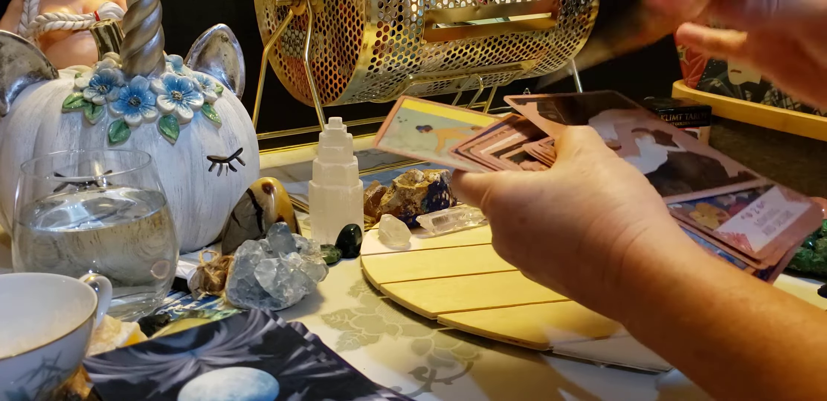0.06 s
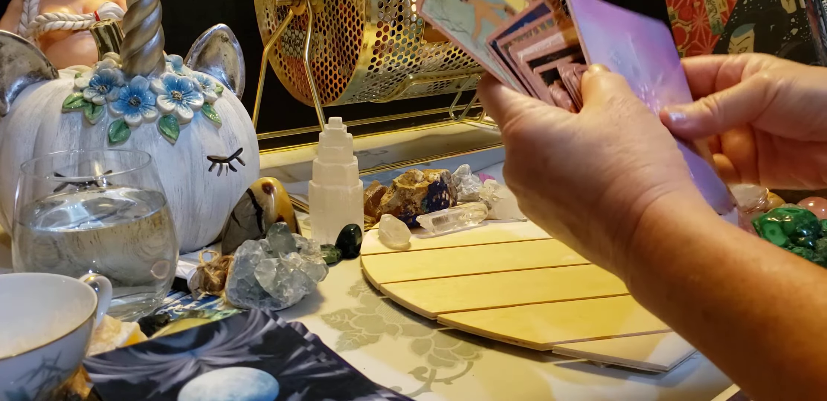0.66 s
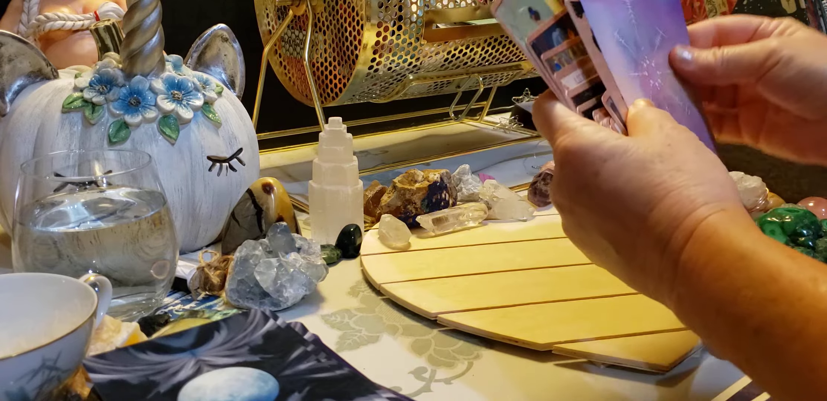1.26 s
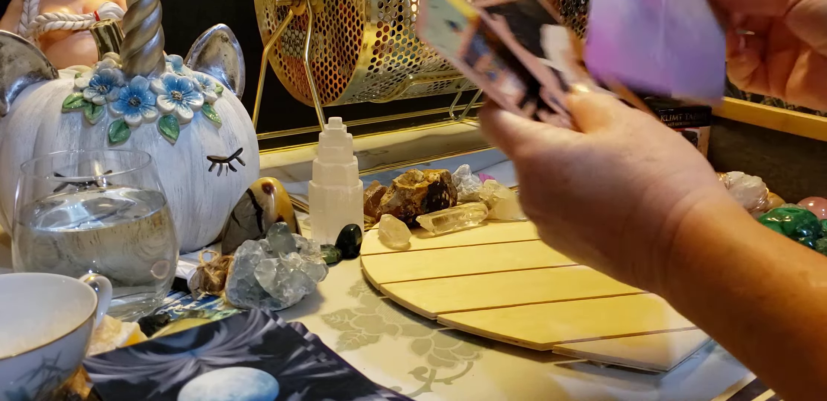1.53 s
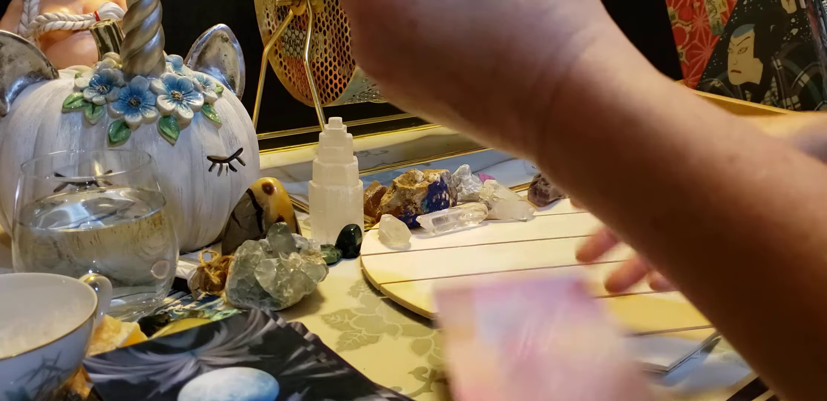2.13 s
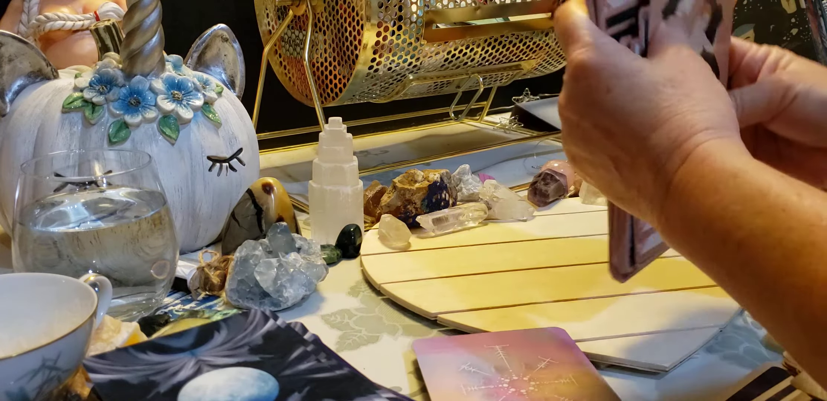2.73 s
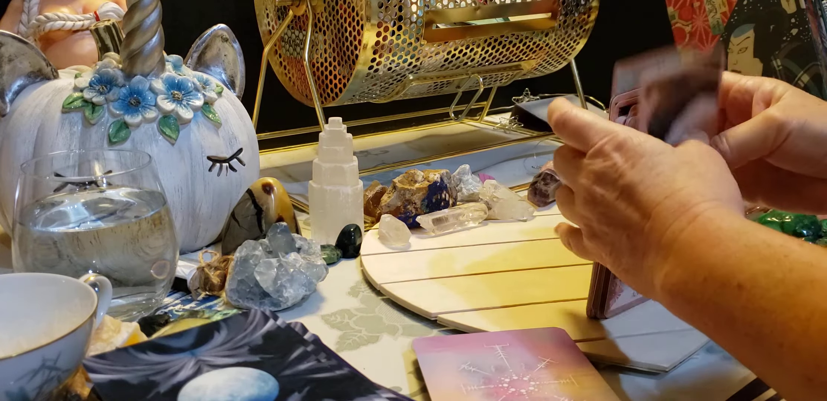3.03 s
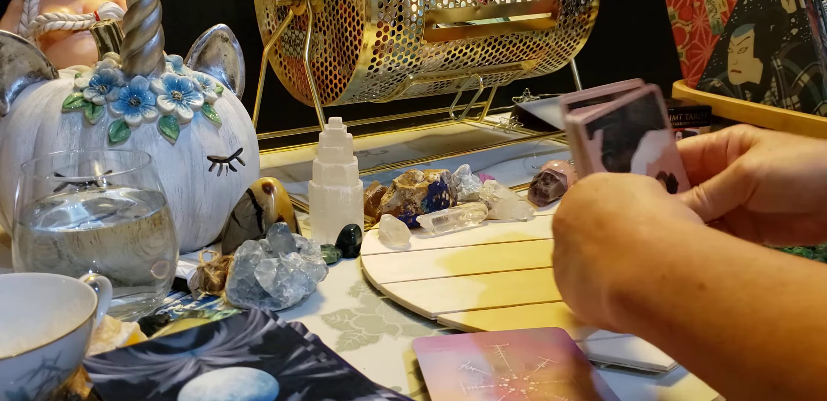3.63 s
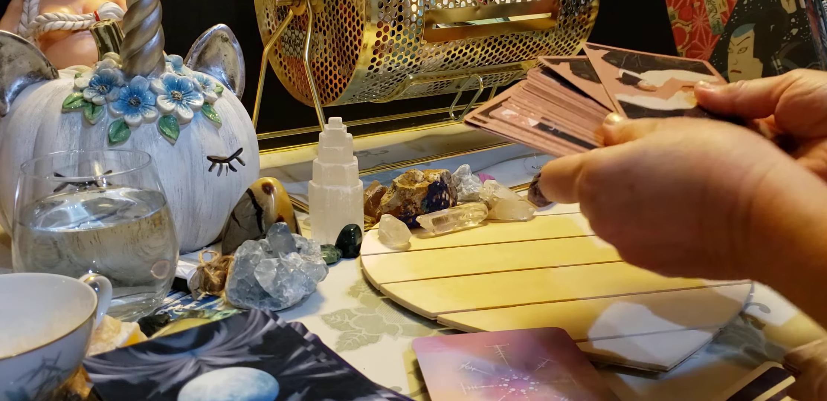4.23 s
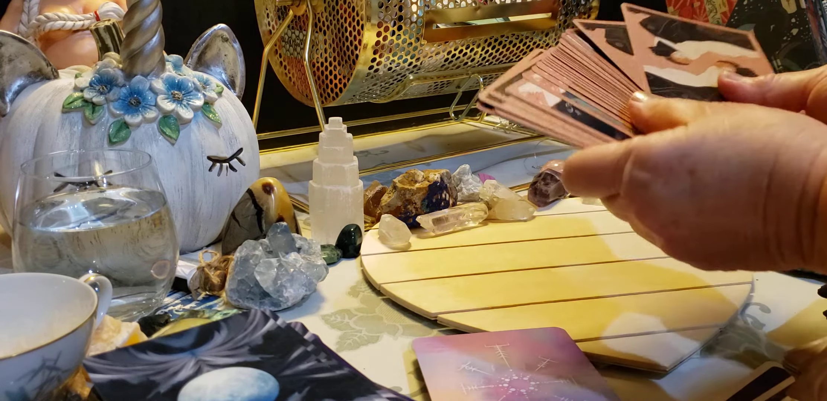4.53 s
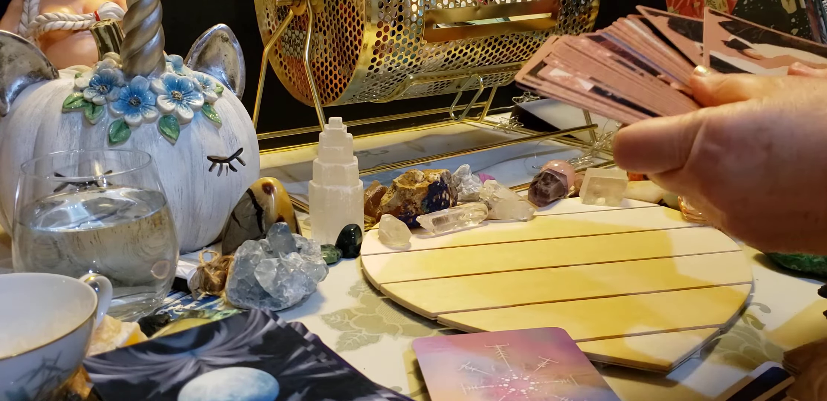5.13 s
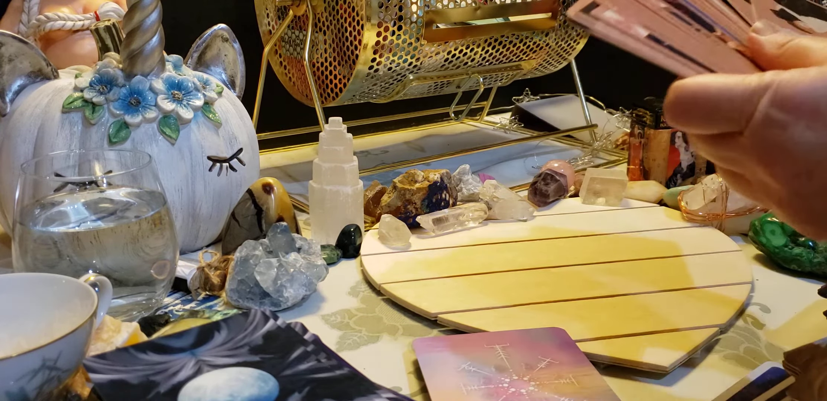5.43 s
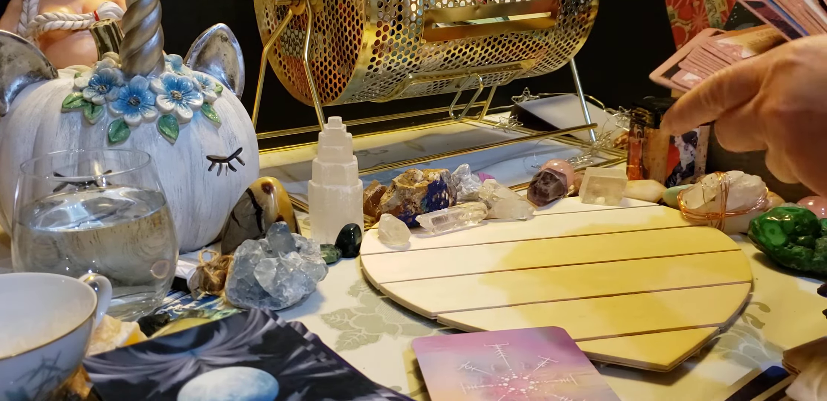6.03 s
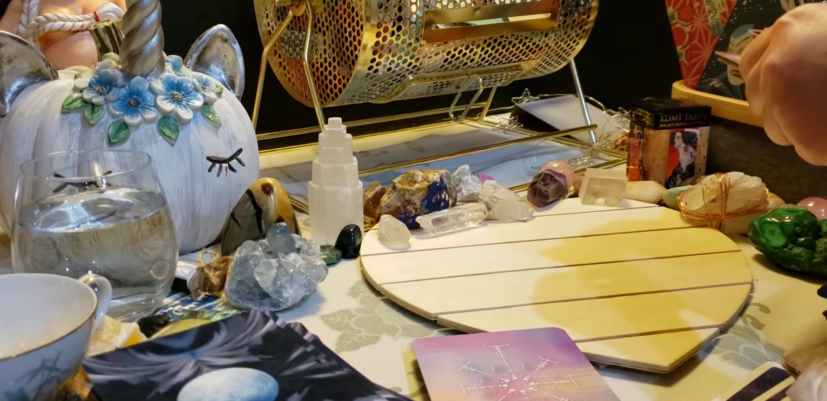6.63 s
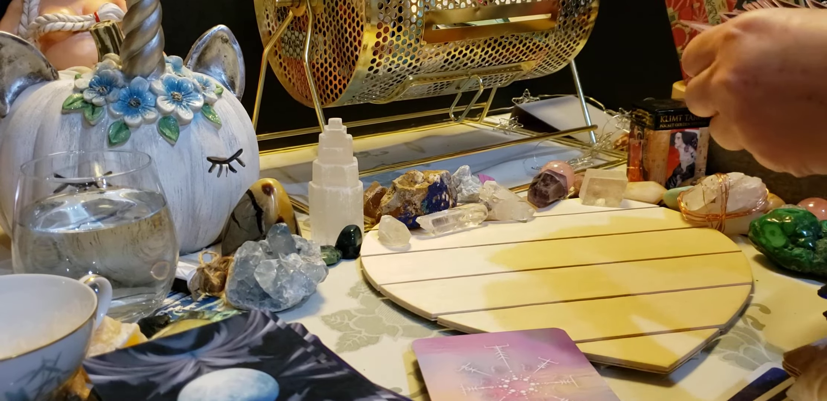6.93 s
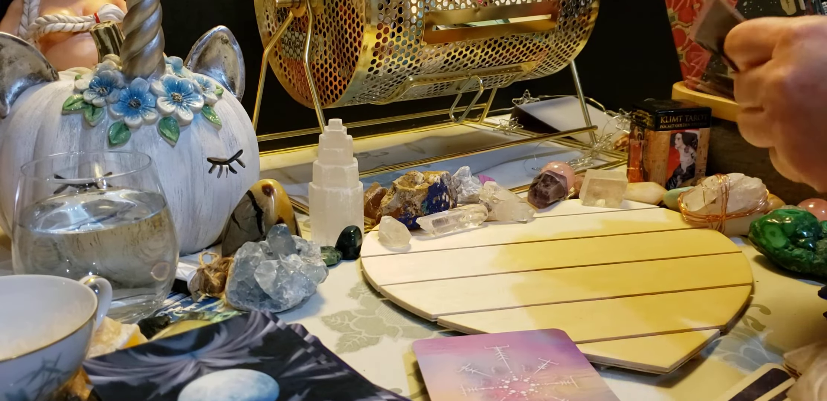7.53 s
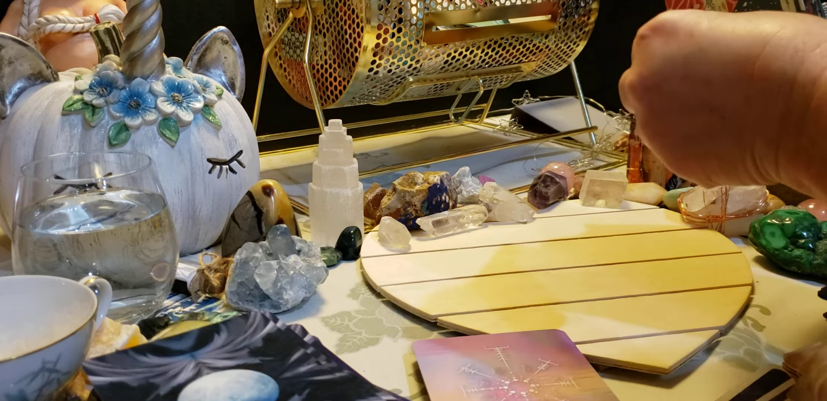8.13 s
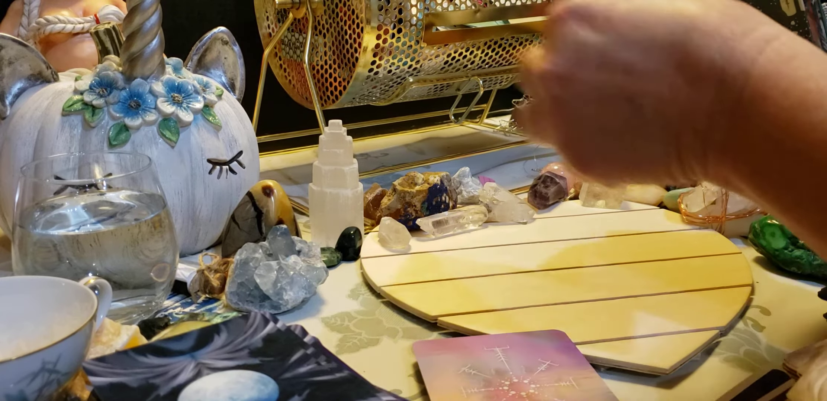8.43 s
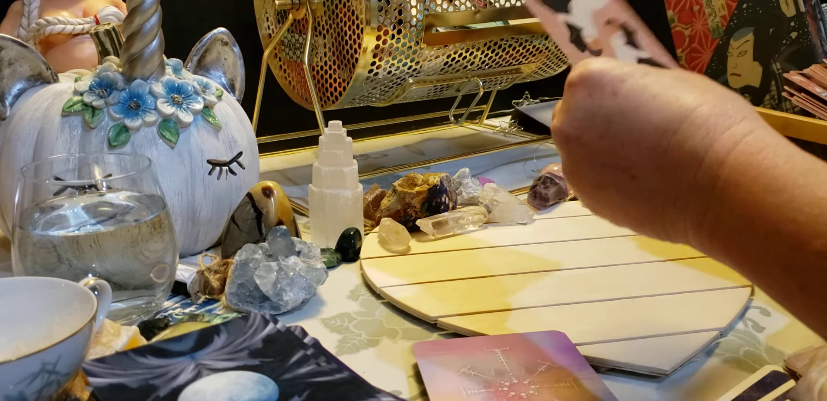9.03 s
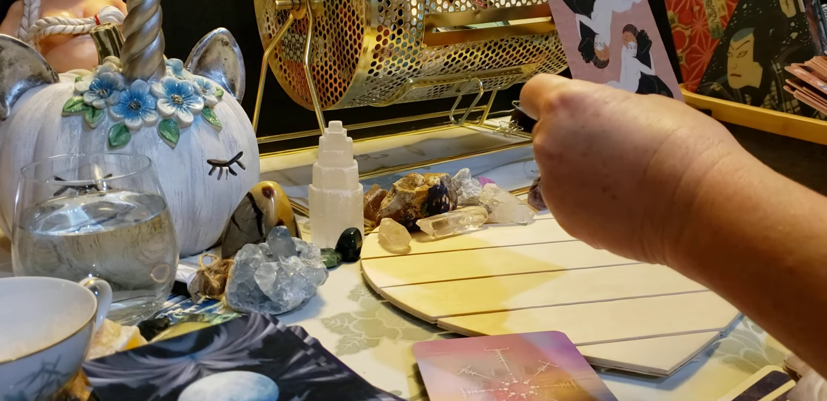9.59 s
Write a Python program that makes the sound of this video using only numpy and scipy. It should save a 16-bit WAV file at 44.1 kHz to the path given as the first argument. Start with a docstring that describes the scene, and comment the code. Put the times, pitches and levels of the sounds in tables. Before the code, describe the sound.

In a quiet room with a steady low hum and faint hiss, cards are handled close by. Dry swishes and crisp snaps come first, then three quick knocks as the deck is squared on a wooden table top. The cards spread with a light, high rasp and slide faintly for a while. Near the end one is pulled out, and fingers rustle softly on the pack.

```python
"""Oracle cards are handled over a wooden table in a quiet room with a low hum.
First they swish over each other and snap off the fingers, and one is laid down. Around 3 s the deck
is knocked square, thudding the table top; an automatic gain sinks after the knocks and creeps back.
Near 4 s the deck fans out with a rasp of edges, and faint slides follow. Another card is drawn at
about 8.5 s, and last the fingers shift on the pack with a soft, low rustle."""
import sys
import numpy as np
from scipy import signal
from scipy.fft import rfft, irfft, next_fast_len
from scipy.io import wavfile
from scipy.ndimage import uniform_filter1d

SR = 44100
rng = np.random.default_rng(int(sys.argv[2]) if len(sys.argv) > 2 else 0)


def pcm_store(signal):
    """Save signal as 16-bit PCM."""
    levels = np.round(np.clip(np.atleast_2d(signal), -1, 1) * 32767)
    wavfile.write(sys.argv[1], SR, levels.astype(np.int16).T)


N = 430416
TIME = np.arange(N) / SR

# bright resonances of a card's edge: pitch_hz, width_hz, level_db
EDGE_MODES = [(5880, 790, 1), (8810, 1200, -0.5), (11500, 7500, -5), (15270, 1900, -2.5)]
# stereo balance of sliding cards: frequency_hz, left_minus_right_db
SLIDE_BALANCE = [(1000, 1.5), (2000, 3.5), (3500, -1.5), (5500, -5), (8000, -6.5), (11000, -2), (15000, -5)]


def from_db(db):
    return 10 ** (np.asarray(db) / 20)


def rms_one(x):
    return x / np.sqrt(np.mean(x ** 2) + 1e-20)


def at_hz(points, hz):
    """Reads a curve of (frequency_hz, value) on a log-frequency axis."""
    points_hz, values = np.transpose(points)
    return np.interp(np.log(np.maximum(hz, 1)), np.log(points_hz), values)


def drift(rate_hz):
    """A smooth random wobble with rms 1."""
    control_hz = 400
    noise = rng.standard_normal(int(TIME[-1] * control_hz) + 800)
    pole = np.exp(-2 * np.pi * rate_hz / control_hz)
    slow = signal.lfilter([1], [1, -2 * pole, pole * pole], noise)[798:]
    return np.interp(TIME * control_hz, np.arange(len(slow)), rms_one(slow))


def coloured(noise, colour):
    """Shapes noise with an EQ curve; rms 1."""
    size = next_fast_len(N)
    eq = from_db(at_hz(colour, np.fft.rfftfreq(size, 1 / SR)))
    return rms_one(irfft(rfft(noise, size) * eq, size)[..., :N])


def stereo_noise(side_db):
    """White noise common to both ears, plus a part that differs."""
    mid, side = rng.standard_normal((2, N))
    return mid + from_db(side_db) * side * np.array([[1], [-1]])


def panned(x, balance):
    """Each microphone favours different bands."""
    size = next_fast_len(N + SR // 10)
    pan_db = at_hz(balance, np.fft.rfftfreq(size, 1 / SR))
    return irfft(rfft(x, size) * from_db([pan_db / 2, -pan_db / 2]), size)[:, :N]


def resonate(x, modes):
    """Parallel resonances with alternating signs."""
    out = 0
    for k, (hz, width_hz, db) in enumerate(modes):
        r = np.exp(-np.pi * width_hz / SR)
        feedforward = np.array([1, 0, -1]) * (1 - r * r) / 2
        feedback = [1, -2 * r * np.cos(2 * np.pi * hz / SR), r * r]
        out = out + (-1) ** k * from_db(db) * signal.lfilter(feedforward, feedback, x + 1e-18)
    return out


def microphone_noise():
    """The microphones' own noise: a faint hiss in both ears, a stronger narrow one on the left."""
    # colours of the two hisses: frequency_hz, level_db
    broad_hiss = [(1000, 1), (2900, 1), (4600, -1), (7000, -10), (9500, -8.5), (12500, 0), (15500, 3)]
    narrow_hiss = [(600, -18.5), (1000, -11.5), (1450, -15), (1750, -7), (2050, 0.5), (2350, -0.5),
                   (2600, -8.5), (2900, -24), (4600, -28), (7000, -39.5)]
    both = from_db(-77) * coloured(rng.standard_normal((2, N)), broad_hiss)
    left = from_db(-63) * coloured(rng.standard_normal(N), narrow_hiss)
    return both + np.array([left, np.zeros(N)])


def room_tone():
    """A motor and the mains hum, some lines wavering, over a low rush of air."""
    # hum lines: pitch_hz, level_db, unsteadiness (0-1)
    hum_lines = [(58.9, -59.5, 0), (104.8, -61, 0), (120, -55.5, .08), (228.5, -61, 0.6), (236.6, -66, 0),
                 (292, -70, 0.5), (315.6, -68, 0.8)]
    # colour of the air: frequency_hz, level_db
    air_colour = [(22, -17.5), (45, -1.5), (85, 1), (135, -2.5), (175, 5), (260, 0.5), (330, -3),
                  (450, -4.5), (560, -12), (800, -20.5), (1500, -32), (3000, -40.5), (8000, -60)]
    hum = 0
    for hz, db, unsteadiness in hum_lines:
        phase = 2 * np.pi * (hz * TIME + rng.random())
        tone = np.sin(phase) * (1 + unsteadiness * drift(6.8))
        phase_wobble = unsteadiness * drift(0.79) * np.cos(phase)
        hum = hum + from_db(db) * rms_one(tone + phase_wobble)
    air = from_db(-58.5) * coloured(stereo_noise(side_db=-8), air_colour)
    return (hum + air) * from_db([[.4], [-.4]])


def room_response(early_db, early_s, tail_db):
    """Quick echoes off the things on the table, then a tail that dies sooner in the treble."""
    # the room's ring: frequency_hz, t60_s
    decay_times = [(200, 0.79), (1000, 0.35), (2000, .42), (4000, 0.23), (8000, .3), (15000, 0.13)]
    t = TIME[:SR * 3 // 4]
    fade_in = np.clip((t - .001) / 0.0083, 0, 1)
    early = rng.standard_normal((2, len(t))) ** 3 * fade_in * np.exp(-t / early_s)
    hz = np.fft.rfftfreq(len(t), 1 / SR)
    white = rfft(rng.standard_normal((2, len(t))))
    edges_hz = np.geomspace(100, 18000, 12)
    tail = 0
    for low, high in zip(edges_hz, edges_hz[1:]):
        band = irfft(white * ((hz >= low) & (hz < high)), len(t))
        t60_s = at_hz(decay_times, np.sqrt(low * high))
        tail = tail + band * fade_in * from_db(-60 * t / t60_s)
    return (from_db(early_db) * rms_one(early) + from_db(tail_db) * rms_one(tail)) / np.sqrt(len(t))


def in_room(x, early_db, early_s, tail_db):
    """The hands are to the right, so that ear hears first; the room answers wide, with mono bass."""
    right_lead_s = .00009
    direct = np.array([np.interp(TIME - right_lead_s, TIME, x[0]), x[1]])
    mid, side = signal.fftconvolve(x, room_response(early_db, early_s, tail_db), axes=1)[:, :N]
    side = signal.sosfilt(signal.butter(1, 700, "high", fs=SR, output="sos"), side)
    return direct + np.array([mid + side, mid - side]) / np.sqrt(2)


def swell(t, peak_s, length_s):
    """Speed of a hand movement: it rises to 1 at peak_s and dies away."""
    rise_share, shape = 0.43, 1.1   # shape: 1 is pointed, 2 is rounded
    slope_s = length_s * np.where(t < peak_s, rise_share, 1 - rise_share)
    return np.exp(-np.abs((t - peak_s) / slope_s) ** shape)


def finger_rustle():
    """Fingers shift on the pack with a soft, low rustle."""
    # colour of the rustle: frequency_hz, level_db
    rustle_colour = [(90, -9), (150, 15), (300, 1.5), (450, 10.5), (600, -1.5), (1000, -51)]
    rustle = coloured(stereo_noise(side_db=-9.5), rustle_colour)
    return from_db(-52) * swell(TIME, peak_s=9.57, length_s=0.16) * rustle


def friction(colour, grain_db, grain_hz, wander_db, centres_hz):
    """Paper fibres catch and let go in tiny clumps; a few bands swell and fade as the grip changes."""
    grains = stereo_noise(side_db=0.5) * from_db(grain_db * drift(grain_hz))
    bands = [signal.butter(1, [hz / 1.15, hz * 1.15], "band", fs=SR) for hz in centres_hz]
    wander = sum(signal.lfilter(*band, grains) * drift(4.7) for band in bands)
    return coloured(grains + from_db(wander_db) * wander, colour)


def fanning():
    """The edges of the whole deck slide past each other as it opens: a long, high rasp."""
    # colour of many edges sliding at once: frequency_hz, level_db
    fan_colour = [(3300, -22.5), (4400, -3), (5500, -0.5), (6400, -5), (7500, -19.5)]
    edges = friction(fan_colour, grain_db=2.5, grain_hz=25, wander_db=-5, centres_hz=[4600, 5800])
    return panned(from_db(-73) * swell(TIME, peak_s=4.12, length_s=.45) * edges, SLIDE_BALANCE)


def stroke_envelopes():
    """Swish, rasp and rub follow the speed of each stroke; a firm grip adds rasp and rub."""
    # strokes of card on card: peak_s, length_s, swish_db, grip_db
    strokes = [(.005, 0.019, -54.5, -7), (0.062, .065, -60.5, -3), (0.175, 0.079, -59, 7),
               (0.346, 0.12, -62.5, -2), (0.462, .075, -55, -9), (0.693, 0.42, -70.5, -3),
               (0.965, 0.12, -68, -9), (1.092, 0.13, -75.5, 15), (1.286, 0.14, -65.5, 11),
               (1.466, 0.03, -65.5, 12.5), (1.534, .08, -71, 1), (1.783, 0.14, -73.5, 7),
               (2.578, 0.064, -63, 1.5), (2.87, 0.5, -68, -2), (3.342, 0.17, -62, -1),
               (3.527, 0.12, -69, 22), (3.694, 0.094, -60.5, -15), (3.745, 0.063, -56.5, -1.5),
               (3.895, 0.1, -60, -13), (4.084, 0.35, -73.5, -1.5), (4.279, .16, -71, -3),
               (4.665, 0.064, -78.5, 5.5), (5.091, 0.095, -78.5, 10), (5.537, .125, -72, -6),
               (6.134, 0.072, -71, -11), (6.395, .115, -69.5, -4.5), (6.919, .05, -74.5, 10.5),
               (7.087, .06, -78.5, 8), (7.41, .07, -76.5, 8.5), (7.699, 0.095, -67, -10),
               (7.746, 0.058, -65.5, 4.5), (8.136, .06, -80.5, 2), (8.414, .1, -63.5, 3),
               (8.48, 0.074, -56.5, 3), (8.863, .04, -65, 0)]
    t = TIME[::32]
    creep_db = -94.5 + 4.5 * np.interp(t, TIME, drift(3.3))   # held cards never lie quite still
    power = from_db(creep_db) ** 2
    for peak_s, length_s, swish_db, grip_db in strokes:
        rasp_db = swish_db + 0.7 + .5 * grip_db
        rub_db = swish_db - 5.5 + grip_db
        power = power + np.outer(from_db([swish_db, rasp_db, rub_db]), swell(t, peak_s, length_s)) ** 2
    return [np.interp(TIME, t, np.sqrt(layer)) for layer in power]


def edge_catches():
    """A sliding edge now and then catches with a tiny tick."""
    catches_per_s = 30
    caught = rng.random(N) < catches_per_s / SR
    click_db = 14.5 + 2 * rng.standard_normal((2, N))
    return resonate(caught * from_db(click_db), EDGE_MODES)


def sliding():
    """Card slides on card: faces swish, edges rasp and tick, fingers rub more dully."""
    # colours of faces, edges and fingers: frequency_hz, level_db
    face_colour = [(3000, -26), (5000, -16), (6500, -3), (8800, 4.5), (11000, 1.5), (13000, 2), (15500, -3)]
    edge_colour = [(1500, -13), (2500, -0.5), (3500, -2.5), (4400, -4.5), (5700, -4), (7500, -15)]
    finger_colour = [(300, -22), (550, 8), (900, 10), (1300, 13.5), (1900, 4.5), (3000, -22.5)]
    swish_gain, rasp_gain, rub_gain = stroke_envelopes()
    ticks = edge_catches()
    swish = friction(face_colour, grain_db=1.5, grain_hz=73, wander_db=-6, centres_hz=[6200, 8700])
    rasp = friction(edge_colour, grain_db=2, grain_hz=72, wander_db=-7.5, centres_hz=[3300, 4400, 5700])
    rub = friction(finger_colour, grain_db=2, grain_hz=50, wander_db=-7, centres_hz=[750, 1300])
    return panned(swish_gain * (swish + ticks) + rasp_gain * rasp + rub_gain * rub, SLIDE_BALANCE)


def strike(track, start_s, level_db, modes, spread_s, scatter, top_hz):
    """Adds a hit: a first contact and a dying patter of further edges ring the modes."""
    t = TIME[:SR // 7]
    common, left, right = rms_one(np.sinh(rng.standard_normal((3, len(t)))))   # spiky noise
    edges = common + from_db(1) * np.array([left, right])
    patter = scatter * edges * np.exp(-t / spread_s) / np.sqrt(spread_s * SR)
    patter[:, 0] += 1   # the first contact
    # cardboard gives way, so the contact holds little above top_hz
    force = signal.lfilter(*signal.butter(2, top_hz, fs=SR), patter + 1e-18)
    hit = resonate(force, modes)
    power = uniform_filter1d(np.mean(hit ** 2, axis=0), size=88)
    hit *= from_db(level_db) / np.sqrt(power.max())   # the loudest 2 ms set the level
    start = round(start_s * SR)
    track[:, start:start + hit.shape[1]] += hit[:, :N - start]


def card_snaps():
    """A bent card slips free, then slaps: each time edge and sheet sound; the slap flaps the air."""
    # a card slaps its neighbour: slap_s, ring_db, crack_db, flap_db
    snaps = [(.0214, -47.5, -58, -60), (.115, -50, -59.5, -58), (.149, -47, -65, -37),
             (.1535, -43.5, -57, -54), (.1785, -26.5, -37.5, -37.5), (.4052, -30, -46, -47),
             (.659, -63, -63.5, -67), (1.188, -46, -54.5, -61), (1.3564, -54, -65, -59),
             (1.7938, -53, -69, -52), (1.827, -41, -61.5, -39.5), (1.8517, -40, -62, -40),
             (2.186, -51, -73, -51), (2.2013, -27.5, -48.5, -48.5), (2.209, -35, -61, -44),
             (2.2172, -23, -42.5, -42), (2.2947, -37.5, -60, -57.5), (8.506, -47, -59, -55),
             (8.851, -53, -60.5, -76)]
    # a flipped or dropped card pushes air: start_s, level_db
    puffs = [(0.149, -43), (.179, -38.5), (1.851, -64), (2.215, -66)]
    # resonances of one sheet, its flap and its puff of air: pitch_hz, width_hz, level_db
    sheet_modes = [(1160, 920, -3), (1760, 1200, 1.5), (2720, 530, -4.5), (2980, 250, 1), (4940, 730, -2)]
    flap_modes = [(308, 390, -3), (610, 210, 1.5), (1000, 580, -4.5)]
    puff_modes = [(179, 63, -1.7), (280, 75, 0.49), (420, 250, -1.2)]
    flight_s = .003
    out = np.zeros((2, N))
    for slap_s, ring_db, crack_db, flap_db in snaps:
        slip = (slap_s - flight_s, ring_db - 10, crack_db + 1.5)
        slap = (slap_s, ring_db, crack_db)
        for at_s, sheet_db, edge_db in slip, slap:
            strike(out, at_s, sheet_db - 2, sheet_modes, spread_s=0.0013, scatter=2.2, top_hz=3530)
            strike(out, at_s, edge_db + 3.5, EDGE_MODES, spread_s=0.003, scatter=11, top_hz=19000)
        strike(out, slap_s, flap_db, flap_modes, spread_s=0.0054, scatter=5.1, top_hz=1500)
    for start_s, level_db in puffs:
        strike(out, start_s, level_db, puff_modes, spread_s=0.0047, scatter=0.13, top_hz=704)
    return out


def deck_knocks():
    """The deck lands in packets a moment apart and rebounds once; the table top thuds under it."""
    # the deck lands on its edge: start_s, knock_db, crack_db, thud_db, packet_count, landing_length_s,
    # last_packet_db (against the first), rebound_delay_s
    knocks = [(2.885, -16, -40.5, -38, 6, 0.03, 4, 0.073),
              (2.9857, -14, -42.5, -51, 3, 0.0093, -13.5, 0.038),
              (3.1009, -5, -29.5, -51, 3, .015, -9.5, .059), (3.522, -40.5, -75, -55, 3, .012, -0.5, 0.042)]
    # resonances of the deck on the table, with the long narrow rings of a brass cup nearby, and of the table
    # top: pitch_hz, width_hz, level_db
    deck_modes = [(764, 15, -11.5), (906, 120, -16.5), (1200, 120, -16), (1541, 29, -2), (1690, 240, 4.5),
                  (1785, 70, -4), (1943, 40, -8), (2340, 320, -3), (3020, 360, -6), (3570, 110, -6),
                  (3860, 400, -18.5), (5130, 790, -20), (6150, 850, -25.5)]
    table_modes = [(224.4, 23, 0), (276, 12, 4.5), (405, 35, -2.5), (562.7, 150, -19)]
    second_packet_s, rebound_db = .0032, -12.5
    crack_follows, thud_follows = 0.75, 0.73   # dB per dB of force
    out = np.zeros((2, N))
    for start_s, knock_db, crack_db, thud_db, packets, landing_s, last_db, rebound_s in knocks:
        delays_s = [0, *np.linspace(second_packet_s, landing_s, round(packets) - 1)]
        contacts = [(start_s + delay, last_db * delay / landing_s) for delay in delays_s]
        contacts.append((start_s + rebound_s, rebound_db))
        for at_s, force_db in contacts:
            deck_db = knock_db + force_db - 1.5
            edge_db = crack_db + crack_follows * force_db
            table_db = thud_db + thud_follows * force_db
            strike(out, at_s, deck_db, deck_modes, spread_s=0.0033, scatter=1.5, top_hz=5600)
            strike(out, at_s, edge_db, EDGE_MODES, spread_s=0.0051, scatter=11, top_hz=10900)
            strike(out, at_s, table_db, table_modes, spread_s=.003, scatter=.15, top_hz=1200)
    return out


def scene():
    """Knocks and snaps ring in the room; dry slides and rustle sit over a bed of hum and hiss."""
    # stereo balance of struck cards: frequency_hz, left_minus_right_db
    hit_balance = [(300, 0), (1000, 0), (1800, 3), (3500, 3.5), (5500, -5.5), (8000, -3.5), (11000, -2),
                   (15000, -2)]
    knocks = in_room(deck_knocks(), early_db=-14.5, early_s=0.034, tail_db=-12)
    snaps = in_room(card_snaps(), early_db=-6.5, early_s=0.011, tail_db=-12.5) * from_db([[-.5], [.5]])
    hits = panned(knocks + snaps, hit_balance)
    return hits + sliding() + finger_rustle() + room_tone() + microphone_noise() + fanning()


def gain_control(x, threshold_db, depth_db, release_db_per_s):
    """Loud sound turns the gain down a little; it stays down a while, then creeps back."""
    power = uniform_filter1d(np.mean(x ** 2, axis=0), size=441)
    level_db = 10 * np.log10(np.maximum(power, 1e-12))
    release_db = release_db_per_s * TIME
    held_over_db = np.maximum.accumulate(level_db - threshold_db + release_db) - release_db
    pole = np.exp(-1 / (.08 * SR))   # the gain glides over 80 ms
    reduction_db = signal.lfilter([1 - pole], [1, -pole], np.clip(held_over_db, 0, depth_db))
    return x * from_db(-reduction_db)


def record(dry):
    """Gain control, then a steep cut of the highest treble."""
    cutoff_hz = 16100
    ducked = gain_control(dry, threshold_db=-25.5, depth_db=3.0, release_db_per_s=7.0)
    return signal.sosfilt(signal.ellip(10, .2, 70, cutoff_hz, fs=SR, output="sos"), ducked)


dry = scene()
out = record(dry)
pcm_store(out)
```